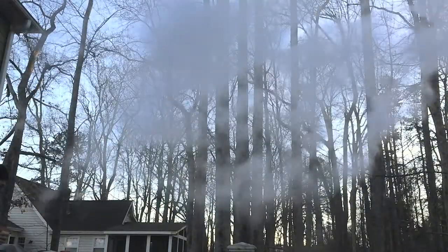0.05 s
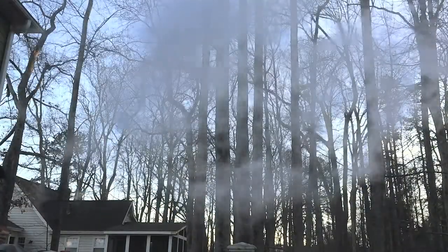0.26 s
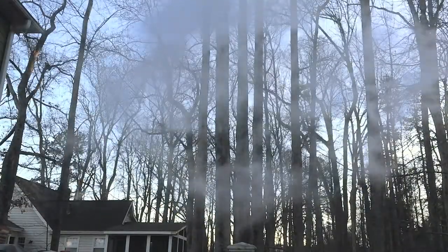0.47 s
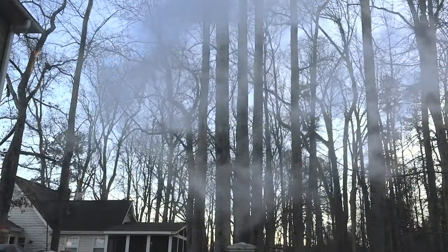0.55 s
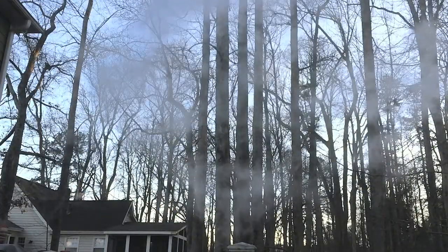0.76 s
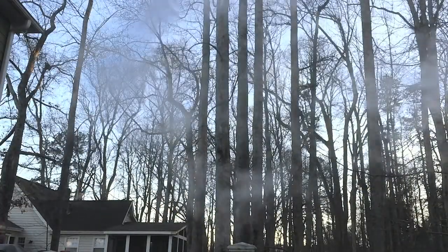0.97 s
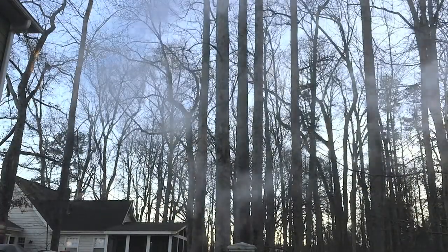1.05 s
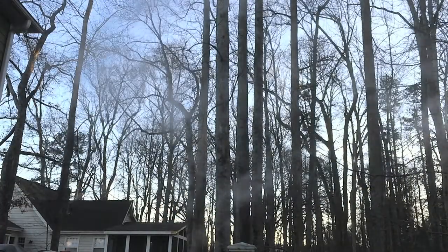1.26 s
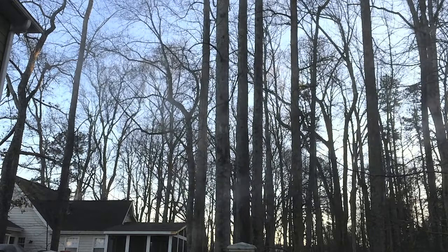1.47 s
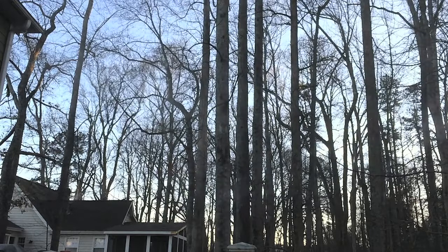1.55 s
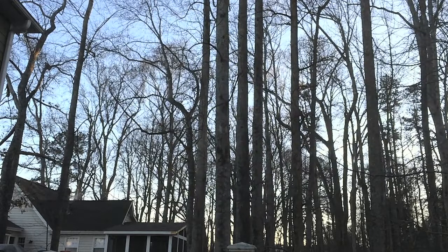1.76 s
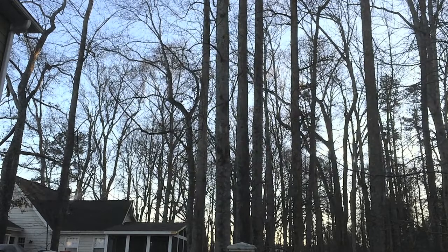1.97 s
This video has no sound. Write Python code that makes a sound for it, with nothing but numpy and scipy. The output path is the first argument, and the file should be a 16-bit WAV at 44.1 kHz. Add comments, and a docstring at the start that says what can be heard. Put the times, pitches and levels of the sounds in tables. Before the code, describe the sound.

A soft hissing rush of hot water vaporizing in cold air holds briefly, then dulls and dies away. Meanwhile, short gusts buffet the microphone with low rumble and small thumps, and a faint drone sits far off outdoors.

```python
"""Hot water thrown into freezing air turns to vapor: from the start, a soft rush with a fine hiss above it,
over faint outdoor air and a distant drone. Within the first second a light wind rumbles on the microphone
in short gusts, eddies thump it and the hardest puffs rasp. The hiss fades and then dulls as the cloud
thins. Near 1.5 s the wind rasps again and pops, while the rush dies away."""
import sys
import numpy as np
from scipy import signal
from scipy.fft import rfft, irfft, next_fast_len
from scipy.io import wavfile
from scipy.ndimage import uniform_filter1d, map_coordinates

SR = 44100
rng = np.random.default_rng(int(sys.argv[2]) if len(sys.argv) > 2 else 0)


def persist_wave(psi):
    """Save psi, clipped to +-1, as 16-bit WAV."""
    counts = np.round(np.clip(psi, -1, 1) * 32767).astype(np.int16)
    wavfile.write(sys.argv[1], SR, np.atleast_2d(counts).T)


N = 88200


def amp(db):
    """Amplitude ratio of a level in decibels."""
    return 10 ** (np.asarray(db) / 20)


def unit(x):
    """Normalisation to an rms of 1."""
    return x / np.sqrt(np.mean(x ** 2) + 1e-20)


def curve(rows):
    """Linear interpolation of (time_s, value) rows to one value per sample."""
    return np.interp(np.arange(N) / SR, *np.transpose(rows))


def wobble(rate_hz):
    """Smooth random modulation: a spline through rate_hz random values a second."""
    return map_coordinates(rng.standard_normal(512), [np.arange(N) * rate_hz / SR], mode="mirror")


def filtered(x, response):
    """Linear filtering: the spectrum of x is multiplied by a frequency response."""
    size = next_fast_len(N + 8192)
    return irfft(rfft(x, size) * response(np.fft.rfftfreq(size, 1 / SR)), size)[:N]


def noise(colour, patchy_db):
    """Spectrally shaped noise of rms 1, its gain varying at random in patches of time and frequency."""
    white = signal.stft(rng.standard_normal(N), nperseg=512)[2]
    patches = uniform_filter1d(rng.standard_normal(white.shape), 6, axis=0)
    patches = uniform_filter1d(patches, 12, axis=1)
    patchy = signal.istft(white * amp(patchy_db * unit(patches)), nperseg=512)[1][:N]
    hz, db = np.transpose(colour)
    return unit(filtered(patchy, lambda f: amp(np.interp(np.log(f + 1), np.log(hz), db))))


def steadied(x, window):
    """Division by the running rms over window samples evens out the slow swings of a noise."""
    return x / np.sqrt(np.abs(uniform_filter1d(x ** 2, size=window)) + .05)


def swells(rows):
    """Amplitude envelope of Gaussian swells, which add in power as incoherent sounds do."""
    t = np.arange(N) / SR
    power = sum(amp(db) ** 2 * np.exp(-((t - crest) / half) ** 2) for crest, half, db in rows)
    return np.sqrt(power)


def outdoor_air():
    """Ambient noise of the open air: steady and dull, its energy mostly at low frequencies."""
    # ambient spectrum: frequency_hz, relative_density_db
    colour = [(20, 7.5), (60, -3), (120, 2.5), (300, -6), (600, -8), (1200, -20.5), (2000, -20.5),
              (3600, -27), (4300, -40.5), (15000, -100)]
    return amp(-64) * noise(colour, patchy_db=2.5)


def distant_drone():
    """Two low noise bands superpose; as their balance shifts, the drone sinks and returns higher."""
    # strength of the two bands: time_s, low_level_db, high_level_db
    levels = [(0, -62, -68), (.15, -55, -74), (.45, -66.5, -75.5), (.8, -67.5, -70.5), (1.2, -66.5, -69.5),
              (1.46, -59.5, -65.5), (1.7, -64.5, -63), (2, -66.5, -60.5)]
    # lower band: frequency_hz, relative_density_db
    low_colour = [(60, -27.5), (120, -4), (175, 3.5), (240, -3.5), (330, -11.5), (420, -16.5), (560, -17.5),
                  (1000, -44), (3000, -120)]
    # upper band: frequency_hz, relative_density_db
    high_colour = [(100, -21.5), (190, -4.5), (250, -1.5), (310, 2.5), (420, -4.5), (520, -18), (1000, -59),
                   (3000, -120)]
    time_s, low_db, high_db = np.transpose(levels)
    low = amp(curve(np.c_[time_s, low_db])) * steadied(noise(low_colour, patchy_db=2.5), window=3000)
    high = amp(curve(np.c_[time_s, high_db])) * steadied(noise(high_colour, patchy_db=3), window=3000)
    return low + high


def breeze():
    """Turbulent pressure on the microphone makes a dull rumble, modulated in amplitude by small puffs."""
    # wind between the gusts, before the flutter: time_s, level_db
    levels = [(0, -72), (.16, -64), (.23, -46.5), (.36, -55), (.48, -64), (.6, -56), (.7, -57.5),
              (.92, -55.5), (1.06, -53.5), (1.3, -52.5), (1.42, -62.5), (1.65, -50.5), (1.73, -61),
              (2, -67)]
    # turbulence spectrum: frequency_hz, relative_density_db
    colour = [(15, -9), (32, -3.5), (55, 3), (85, 0), (135, -10), (200, -22), (500, -55.5), (2000, -120)]
    flutter_db = 2 * wobble(rate_hz=30.14)
    return amp(curve(levels) + flutter_db) * steadied(noise(colour, patchy_db=1.5), window=1800)


def gusts():
    """Short bursts of stronger turbulence reach higher in frequency, so the rumble is fuller."""
    # gusts on the microphone: crest_s, half_length_s, level_db
    bursts = [(.283, 0.0071, -35), (.537, 0.012, -40.5), (.567, 0.0043, -35.5), (.612, 0.016, -50),
              (.657, 0.0089, -52.5), (1.115, 0.016, -49.5), (1.24, 0.011, -49.5), (1.298, 0.0061, -50.5),
              (1.638, 0.0076, -46.5)]
    # gust spectrum: frequency_hz, relative_density_db
    colour = [(15, -18.5), (55, -4), (90, 0), (140, -5.5), (200, -11), (280, -23.5), (500, -54),
              (2500, -120)]
    return swells(bursts) * steadied(noise(colour, patchy_db=0), window=1400)


def rasps():
    """The hardest puffs rasp; a narrow spectral peak makes their noise sound hollow."""
    # hardest puffs: crest_s, half_length_s, level_db
    puffs = [(.27, .009, -51), (.293, 0.0058, -48), (1.493, 0.0038, -50), (1.519, 0.0056, -52.5),
             (1.548, 0.0091, -51)]
    # rasp spectrum: frequency_hz, relative_density_db
    colour = [(150, -16), (290, -10.5), (410, 3.5), (490, -5.5), (620, -20), (1000, -31), (3500, -120)]
    return swells(puffs) * steadied(noise(colour, patchy_db=0), window=500)


def eddies():
    """A passing vortex is a core of suction between two pushes; the shorter it is, the higher the thump."""
    # eddies at the microphone: centre_s, half_width_s, core_level_db
    vortices = [(0.227, 0.0035, -39.5), (0.2564, 0.0038, -34.5), (.276, 0.0022, -29),
                (0.2999, 0.002, -28.5), (0.335, 0.0022, -37.5), (.554, 0.0024, -30), (.731, 0.0038, -50),
                (.78, 0.0027, -40), (0.7971, 0.003, -39.5), (0.925, 0.0033, -40.5), (0.981, 0.0029, -41),
                (1.038, 0.0049, -44.5), (1.172, 0.0032, -43.5), (1.3106, 0.0018, -37),
                (1.3556, 0.0024, -35.5), (1.3737, .0021, -40), (1.5005, 0.003, -39.5),
                (1.5162, 0.0022, -28), (1.5269, 0.003, -33), (1.5514, 0.0039, -35), (1.657, .005, -41.5),
                (1.902, 0.0054, -49)]
    lean = .5  # the push before the core outweighs the push after it
    t, pressure = np.arange(N) / SR, np.zeros(N)
    for centre_s, half_width_s, core_db in vortices:
        u = (t - centre_s) / half_width_s
        pressure += amp(core_db) * (u ** 2 - 1 - lean * u) * np.exp(-u ** 2 / 2)
    return pressure


def pops():
    """Flow separation at the microphone port: a push flips abruptly into suction."""
    # pressure pulses at the port: centre_s, half_width_s, peak_db
    pulses = [(1.4979, 0.00093, -34), (1.5491, 0.00074, -29.5), (1.6013, 0.0011, -39),
              (1.6208, 0.00049, -36.5), (1.63, .0009, -43)]
    tail_decay = 1.4  # per half width, on either side
    t, pressure = np.arange(N) / SR, np.zeros(N)
    for centre_s, half_width_s, peak_db in pulses:
        u = (t - centre_s) / half_width_s
        swing = -u * np.exp(-tail_decay * np.hypot(u, 1))
        pressure += amp(peak_db) * swing / np.abs(swing).max()
    return pressure


def vapor_rush():
    """Hot water turning to vapor gives a soft band of mid-frequency noise that holds, then dies away."""
    # envelope of the rush: time_s, relative_level_db
    levels = [(0, -62.5), (.5, -62), (1, -62.5), (1.3, -63), (1.45, -66), (1.6, -70), (1.76, -70), (2, -79)]
    # rush spectrum: frequency_hz, relative_density_db
    colour = [(200, -20), (450, -3), (740, -2), (950, 0.94), (1400, -0.8), (1620, -6.5), (1950, -11.5),
              (2800, -23), (5000, -46), (12000, -120)]
    gain_db = 0.78
    return amp(curve(levels) + gain_db) * noise(colour, patchy_db=1.07)


def vapor_hiss():
    """The cloud's broadband hiss fades from the start; as the cloud thins, a low-passed share dulls it."""
    # envelope of the hiss: time_s, level_db
    levels = [(0, -65), (.06, -68.5), (.35, -71.5), (.55, -71), (1.15, -73), (1.45, -77), (1.7, -81.5),
              (1.85, -86.5), (2, -97)]
    # hiss spectrum: frequency_hz, relative_density_db
    colour = [(700, 2.5), (2000, 2), (3200, 3.5), (4200, 1), (5500, -1), (7300, -1.5), (9500, -5),
              (15000, -8.5)]
    # thinning of the cloud: time_s, dulled_fraction
    thinning = [(1, 0), (1.9, 0.2)]
    corner_hz = 9000
    fresh = noise(colour, patchy_db=.4)
    dull = filtered(fresh, lambda hz: 1 / np.hypot(1, (hz / corner_hz) ** 2))
    return amp(curve(levels)) * (fresh + curve(thinning) * (dull - fresh))


def scene():
    """Superposition: the pressures of vapor, wind and background add at one microphone."""
    vapor = vapor_rush() + vapor_hiss()
    wind = breeze() + gusts() + rasps() + eddies() + pops()
    return (vapor + wind + outdoor_air() + distant_drone())[None]


def record(dry):
    """Band limiting: a third-order high-pass thins the deepest rumble; nothing passes above the cutoff."""
    low_cut_hz, cutoff_hz = 40, 15350
    high_pass = lambda hz: hz ** 3 / np.hypot(hz ** 3, low_cut_hz ** 3)
    return np.array([filtered(x, lambda hz: high_pass(hz) * (hz < cutoff_hz)) for x in dry])


dry = scene()
out = record(dry)
persist_wave(out)
```